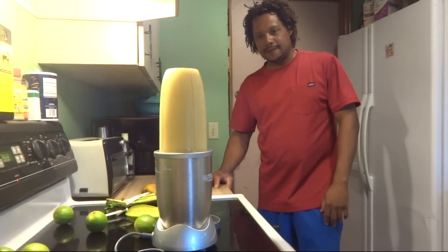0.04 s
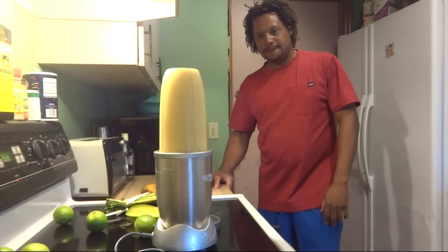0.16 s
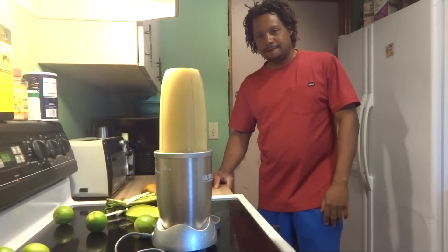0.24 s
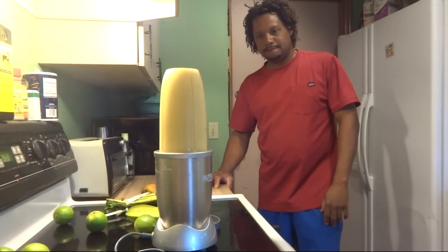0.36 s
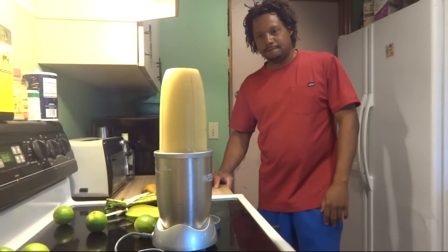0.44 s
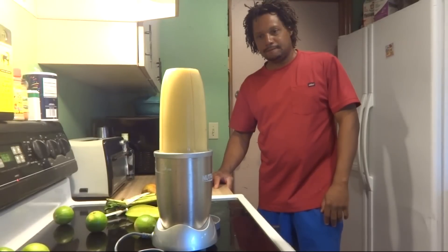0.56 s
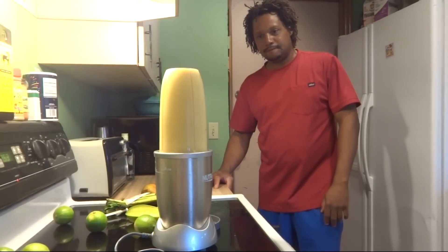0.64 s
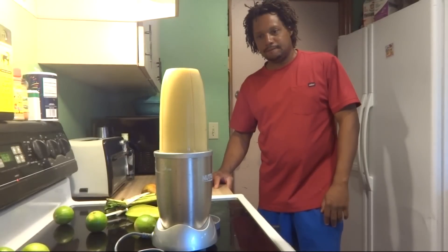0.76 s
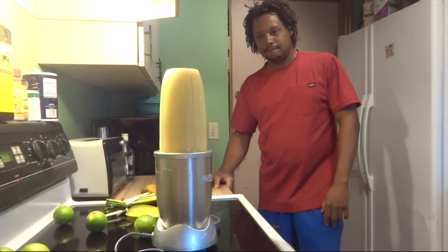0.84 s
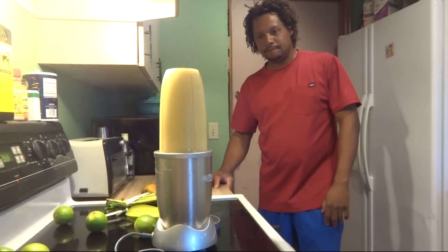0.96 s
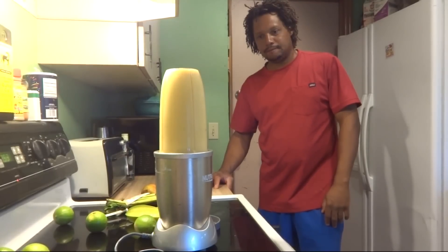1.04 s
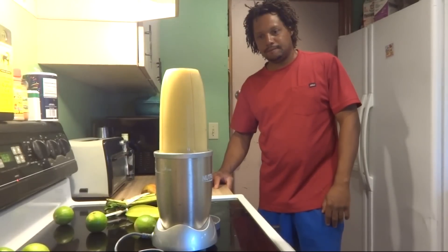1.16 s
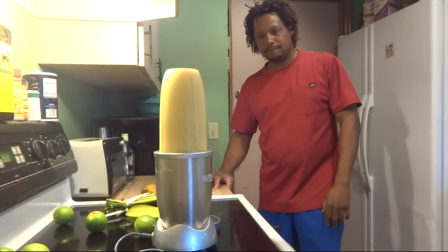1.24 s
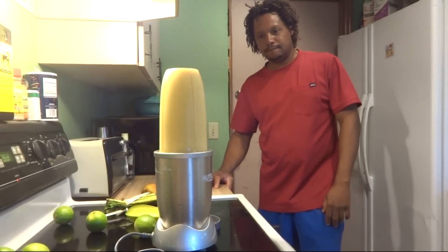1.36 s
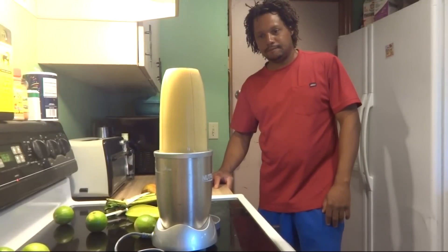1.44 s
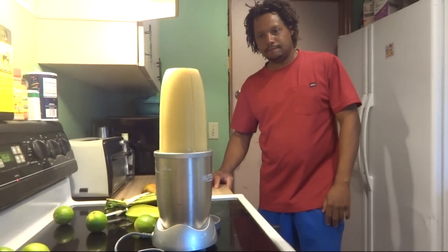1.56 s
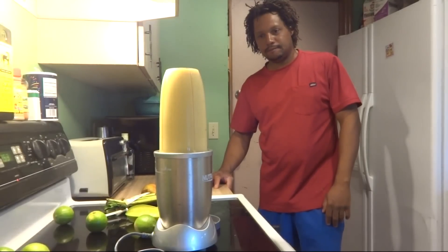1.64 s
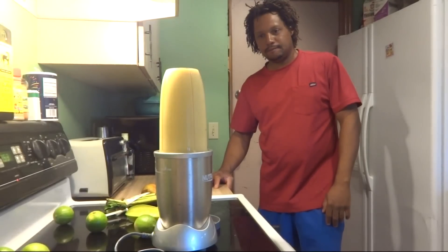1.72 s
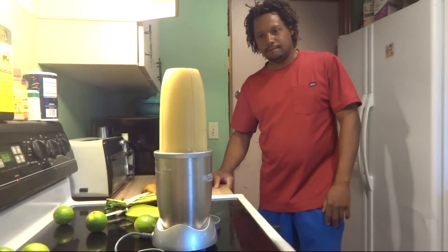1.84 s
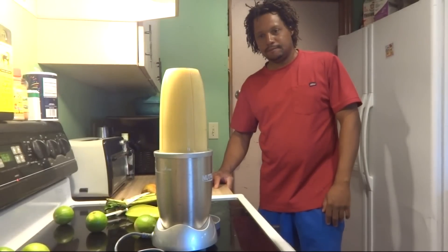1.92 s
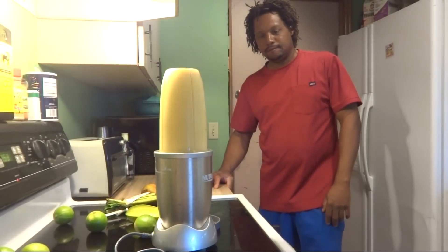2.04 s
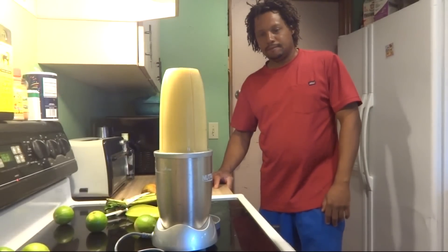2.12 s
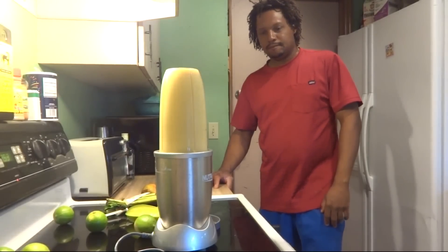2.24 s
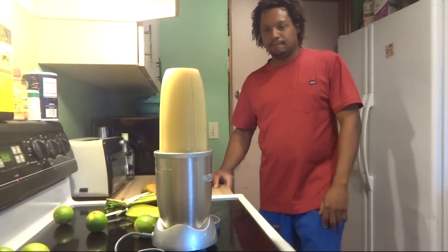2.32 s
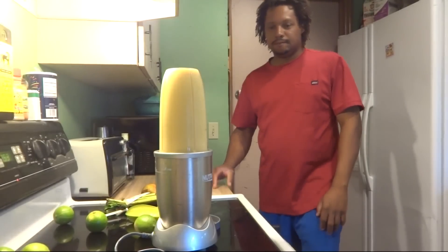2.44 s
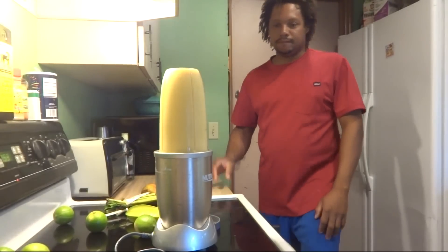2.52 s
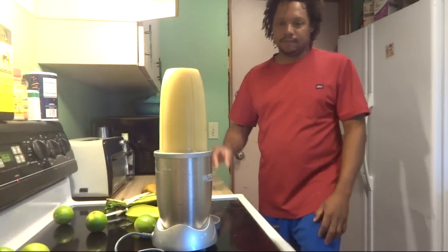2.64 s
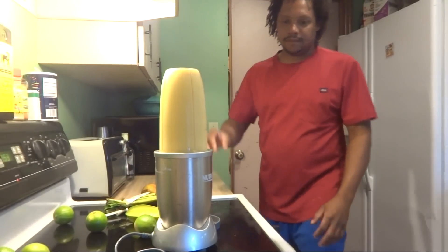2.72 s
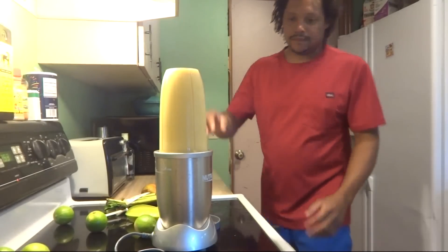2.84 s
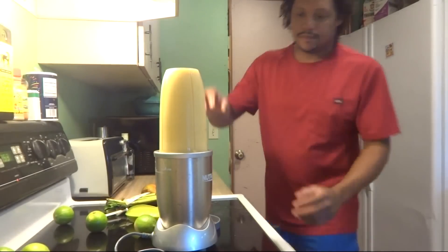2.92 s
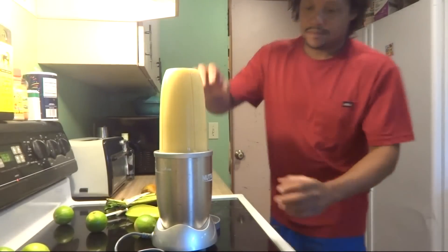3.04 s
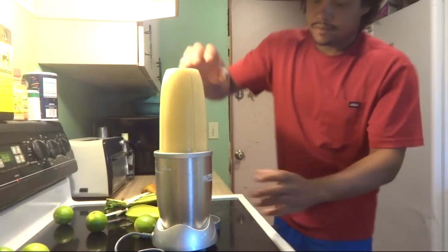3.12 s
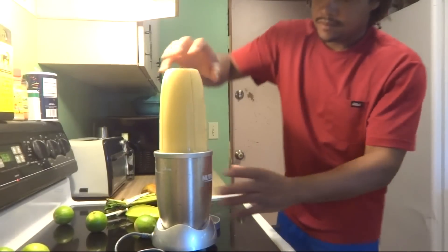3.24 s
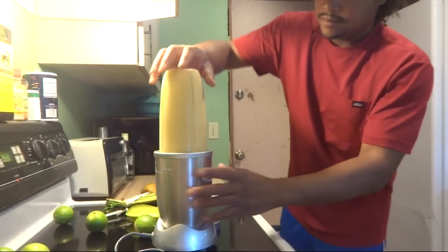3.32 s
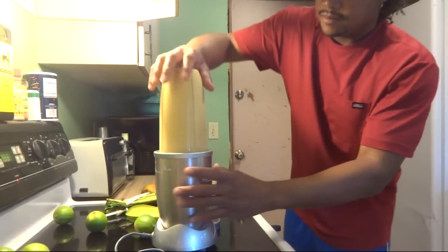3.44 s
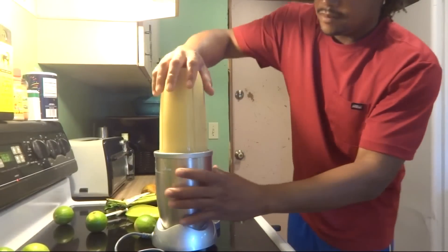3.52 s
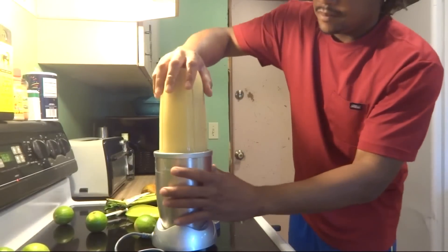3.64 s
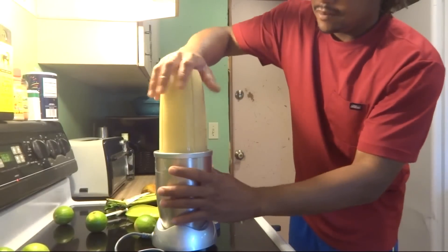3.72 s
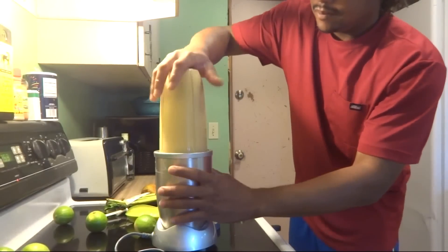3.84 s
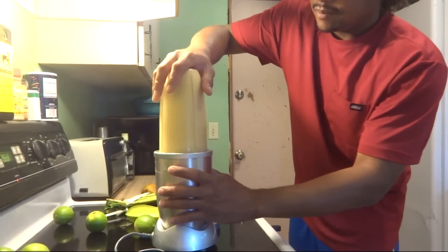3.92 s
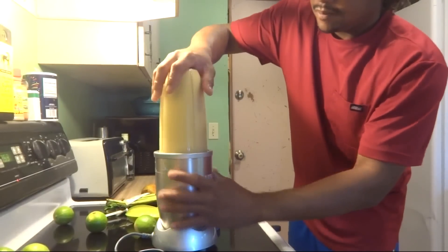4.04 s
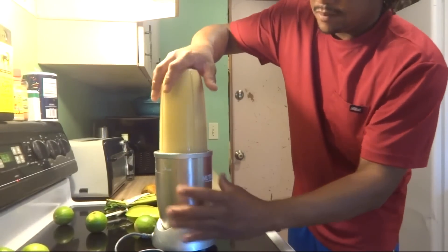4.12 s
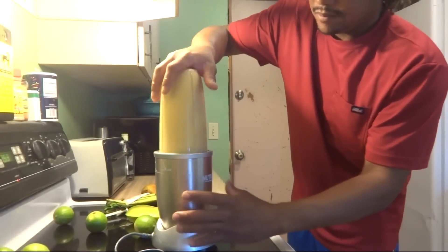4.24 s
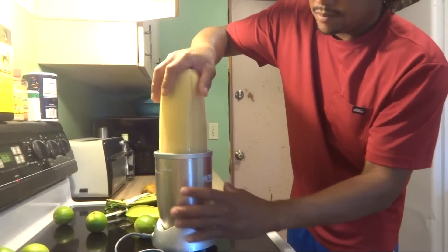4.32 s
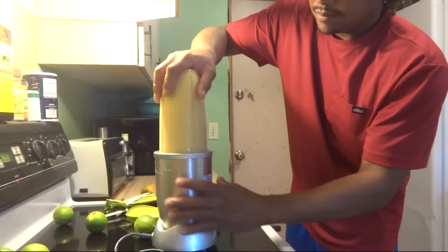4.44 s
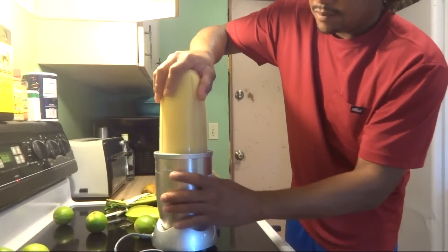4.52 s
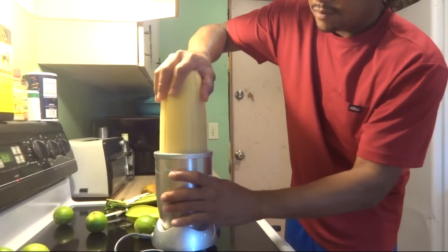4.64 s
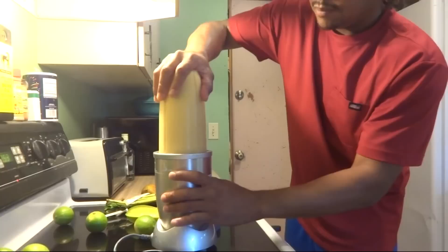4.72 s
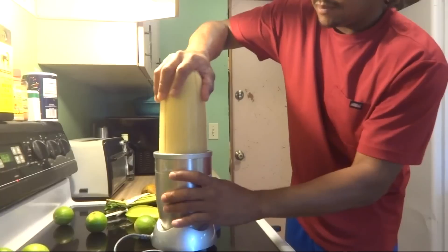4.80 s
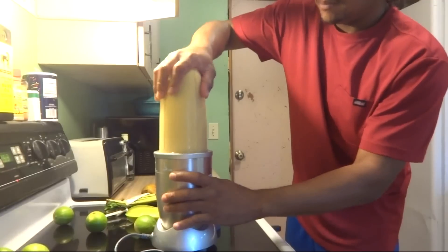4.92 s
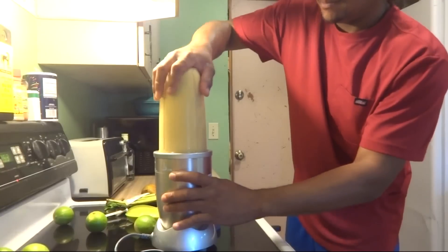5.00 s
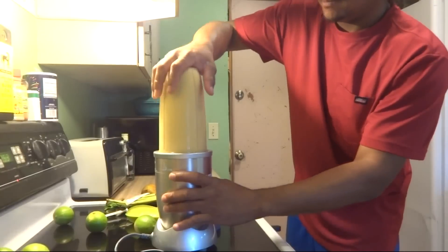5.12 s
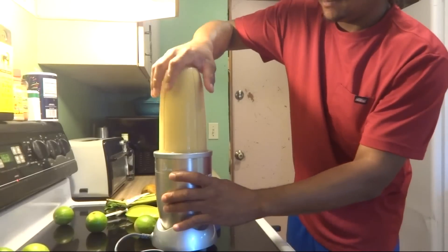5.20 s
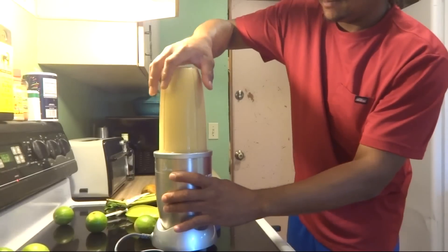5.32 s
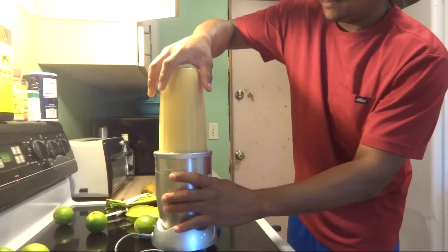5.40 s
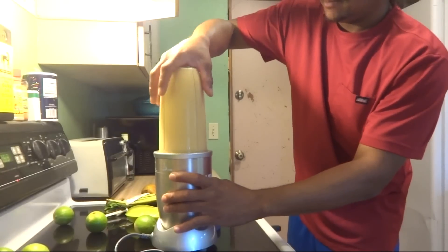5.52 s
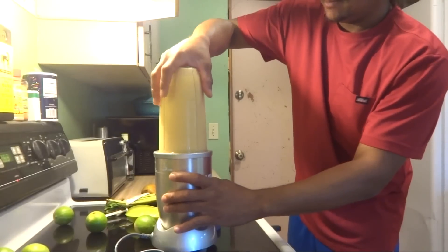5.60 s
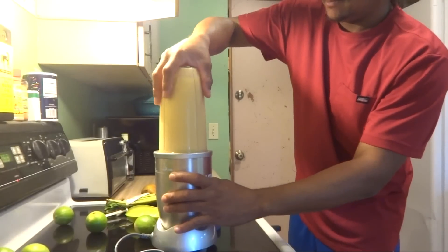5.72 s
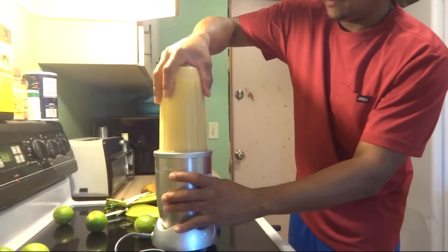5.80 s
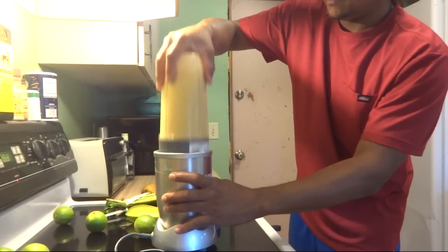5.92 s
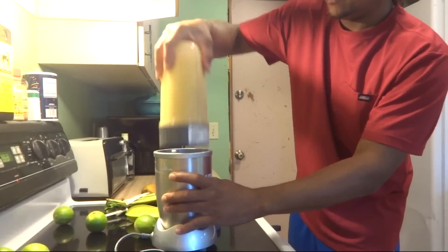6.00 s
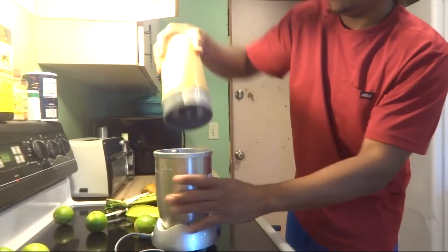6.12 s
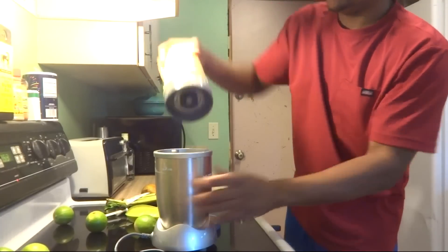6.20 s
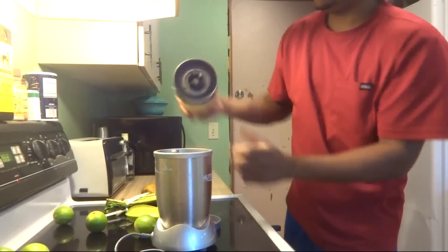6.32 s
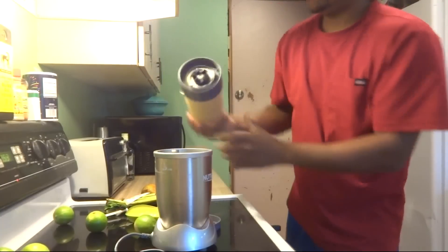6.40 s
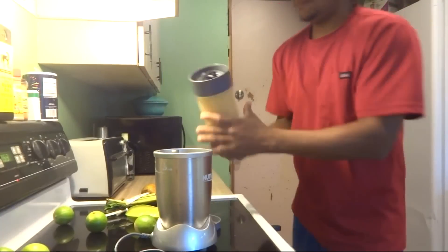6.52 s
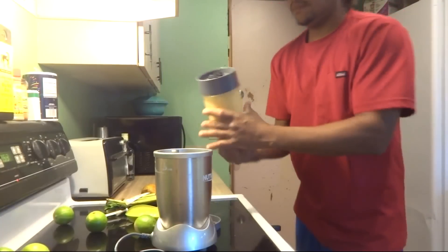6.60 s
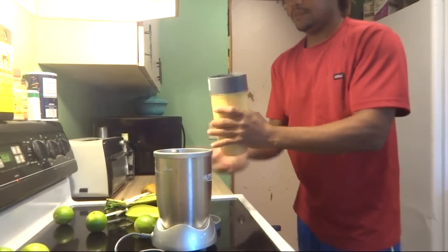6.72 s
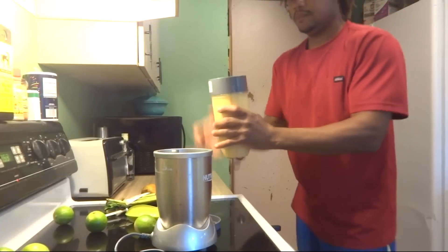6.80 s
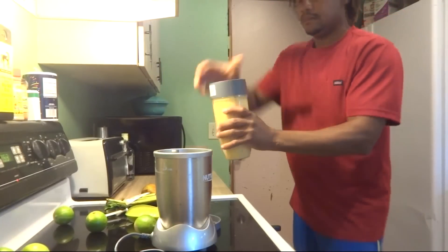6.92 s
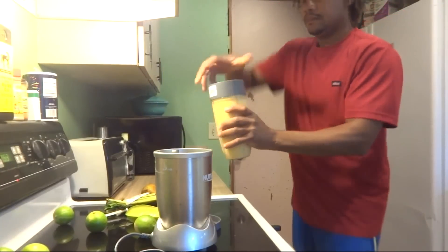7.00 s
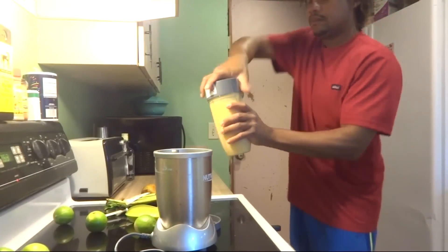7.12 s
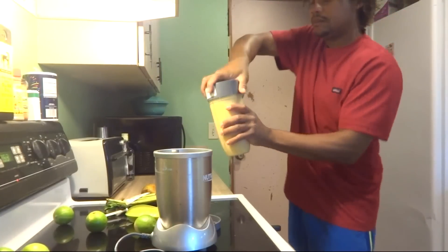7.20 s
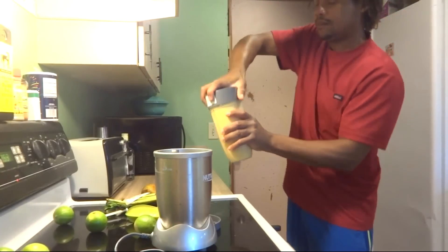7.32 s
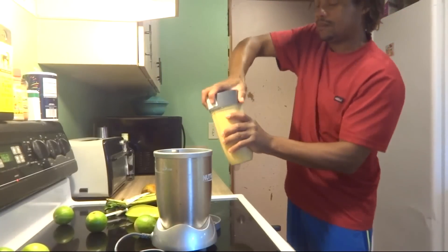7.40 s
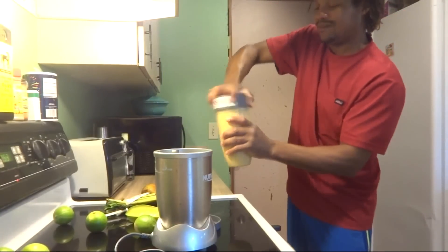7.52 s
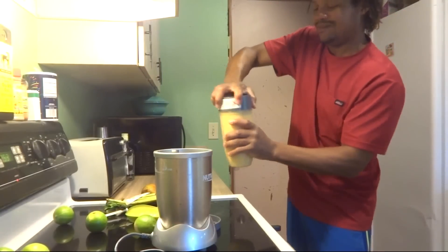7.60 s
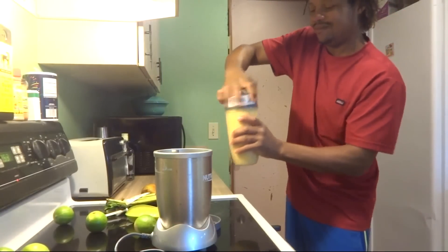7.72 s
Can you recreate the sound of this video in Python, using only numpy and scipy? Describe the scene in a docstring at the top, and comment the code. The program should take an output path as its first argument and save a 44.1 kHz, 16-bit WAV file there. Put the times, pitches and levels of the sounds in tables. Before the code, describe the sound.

Loud close blender whirr with gritty liquid roar, a quick falling wind-down, then soft handling, plastic clicks and a lid cracking loose in a quiet kitchen.

```python
"""On a kitchen counter, close to the microphone, a small blender churns a thick smoothie, then coasts to a stop.
Shaft and blades hum as harmonics of the shaft speed, the commutator whines at higher multiples of it,
and the liquid roars as gritty noise ringing in the cup. The cup is then lifted and turned over:
hands rub on it as shaped noise, knocks ring its modes, and its blade lid cracks loose and squeaks by stick-slip.
Once the motor is quiet, the recorder's gain control slowly brings up the room."""
import sys
import numpy as np
from scipy import signal
from scipy.fft import rfft, irfft, next_fast_len
from scipy.io import wavfile
from scipy.ndimage import uniform_filter1d, minimum_filter1d

SR = 44100
rng = np.random.default_rng(int(sys.argv[2]) if len(sys.argv) > 2 else 0)


def master_out(mix):
    """Clip the mix to full scale and print it as 16-bit PCM to the path in sys.argv[1]."""
    frames = np.transpose(np.atleast_2d(mix))
    ceiling = np.clip(frames, -1, 1)
    pcm = np.round(ceiling * 32767).astype(np.int16)
    wavfile.write(sys.argv[1], SR, pcm)


N = 341775
TIME = np.arange(N) / SR
POWER_OFF_S = 4.95
# Levels in the tables are relative: later trims and the gain control set the final level.


def undb(db):
    """Level to amplitude ratio: 20 dB is a factor of ten."""
    return 10 ** (np.asarray(db) / 20)


def unit(x):
    """Normalize a signal to an rms of 1."""
    return x / np.sqrt(np.mean(x ** 2))


def curves(table):
    """Interpolate each column of a table linearly over time; the first column is t/s."""
    s, *columns = np.transpose(table)
    return [np.interp(TIME, s, c) for c in columns]


def since(start_s):
    """Seconds elapsed after a moment, zero before it."""
    return np.maximum(TIME - start_s, 0)


def walk(rate):
    """Random modulation of spread near 1: straight lines between random values drawn rate times a second."""
    steps = rng.standard_normal(2 ** 14)
    count = min(int(rate * N / SR) + 2, len(steps))
    # interpolation lowers the variance to about 2/3; the root restores it
    return np.sqrt(3 / 2) * np.interp(TIME, np.arange(count) / rate, steps[:count])


def shaped(x, response):
    """Linear filtering: multiply the spectrum by a gain that is a function of frequency."""
    size = next_fast_len(len(x) + 8192)
    hz = np.maximum(np.arange(size // 2 + 1) * SR / size, 1)
    return irfft(rfft(x, size) * response(hz), size)[..., :len(x)]


def colour(x, points):
    """Spectral shaping by (f/Hz, level/dB) points, joined by lines over log frequency."""
    at, db = np.transpose(points)
    return shaped(x, lambda hz: undb(np.interp(np.log(hz), np.log(at), db)))


def resonance(hz, centre, width):
    """Complex response of one damped mode, 1 at its centre."""
    return 1 / (1 + 1j * (hz ** 2 - centre ** 2) / (hz * width))


def mode_gain(hz, modes):
    """Incoherent sum of modes: their powers add at each frequency."""
    grid = np.geomspace(10, 20000, 2000)
    power = sum(np.abs(undb(db) * resonance(grid, f, w)) ** 2 for f, w, db in modes)
    return np.interp(hz, grid, np.sqrt(power))


def grit(spread_db):
    """Dense tiny impacts: noise whose level is redrawn every 16 samples, with limited size."""
    sizes = undb(spread_db * np.minimum(rng.exponential(size=N // 16 + 1), 4))
    return unit(rng.standard_normal(N) * np.repeat(sizes, 16)[:N])


def swell(start_s, length_s, attack_share=0.51, release_s=0.027):
    """Envelope of one stroke: linear build-up, hold, exponential decay."""
    t = TIME - start_s
    attack = np.clip(t / (attack_share * length_s), 0, 1)
    return attack * np.exp(-np.maximum(t - length_s, 0) / release_s)


def room(x, wet_db, t60_s, side_db):
    """Reverberation: direct sound plus decaying noise tails; the two close ports differ mostly in mids and treble."""
    t = TIME[:SR * 2 // 3]
    fade = undb(-60 * t / t60_s) * (t > .003)
    tail_colour = [(100, -3.5), (5000, -9.5), (15000, 2.5)]
    tails = [colour(rng.standard_normal(len(t)), tail_colour) * fade for _ in range(2)]
    mid, side = (undb(wet_db) * signal.fftconvolve(x, h / np.linalg.norm(h))[:N] for h in tails)
    side_colour = [(150, -24), (500, -3.5), (1200, 3.5), (7000, 5.5), (12000, -17.5)]
    side = undb(side_db) * colour(side, side_colour)
    return (x + mid + np.array([side, -side])) / np.sqrt(1 + undb(2 * wet_db))


def kitchen(db=-48, side_db=-17):
    """Ambient noise: low, nearly steady and strongly correlated between the two ports."""
    # spectrum of the quiet kitchen: f/Hz, level/dB per Hz
    kitchen_spectrum = [(15, -35), (25, -15.5), (86, -6), (176, 1.5), (231, -4), (415, -6), (604, -11),
                        (978, -19), (1090, -20), (1210, -21.5), (2240, -47.5), (2630, -39), (3730, -46),
                        (6900, -47), (15000, -55)]
    mid, side = (unit(colour(rng.standard_normal(N), kitchen_spectrum)) for _ in range(2))
    return undb(db + .7 * walk(12)) * (mid + undb(side_db) * np.array([side, -side]))


def whistle(centre_hz=4650, width_hz=300):
    """Narrow-band noise: a faint airy tone while the cup is lifted and turned."""
    # whistles of the moving cup: t/s, length/s, level/dB
    whistle_times = [(5.82, .46, -72), (6.59, .18, -68)]
    tone = unit(shaped(rng.standard_normal(N), lambda hz: resonance(hz, centre_hz, width_hz) ** 2))
    return tone * sum(undb(db) * swell(s, length_s) for s, length_s, db in whistle_times)


def handling(hiss_hz=6000, uneven_db=1.0):
    """Friction noise: skin and sleeves rub the plastic in tiny catches; the treble varies from stroke to stroke."""
    # colour of the rubbing: f/Hz, level/dB per Hz
    rub_colour = [(300, -17.5), (900, 10.5), (2800, 5.5), (4500, 1.5), (8000, -6.5), (11000, -14),
                  (15500, -27)]
    # strokes on the cup: t/s, length/s, level/dB, extra hiss of a quick light stroke/dB
    stroke_list = [(5.95, 0.043, -58, -8), (6.07, 0.23, -63.5, 6), (6.31, 0.21, -57.5, 0),
                   (6.58, .25, -63, -4), (6.91, 0.12, -56, 10), (7.03, 0.035, -46, 2),
                   (7.107, 0.047, -43.5, -3), (7.187, 0.29, -63.5, -4), (7.598, 0.022, -46, 7.5),
                   (7.65, .1, -53, -5)]
    rub = unit(colour(grit(spread_db=2.0), rub_colour))
    hiss = shaped(rub, lambda hz: 1 - 1 / (1 + (hz / hiss_hz) ** 4))
    strokes = 0
    for s, length_s, db, hiss_db in stroke_list:
        friction = rub + (undb(hiss_db) - 1) * hiss
        strokes = strokes + undb(db) * swell(s, length_s) * friction
    return strokes * undb(uneven_db * walk(76))


def knocks(scrape_db=-14):
    """Modal excitation: short rattling contacts of the cup, and cracks of its lid, ring the plastic."""
    # contacts: t/s, level/dB, spectral centre f/Hz, decay time constant/s
    contacts = [(5.947, -46, 910, .014), (5.972, -36.5, 360, 0.013), (6.2, -44.5, 1150, .007),
                (6.503, -60, 3000, 0.0085), (6.78, -65, 8800, 0.0088), (7.033, -49, 1000, 0.0071),
                (7.533, -47, 1200, 0.044), (7.64, -38, 3060, 0.023)]
    # modes of the plastic cup and lid: f/Hz, width/Hz, level/dB
    cup_modes = [(382, 240, 12), (850, 220, 7), (1350, 170, -7), (1930, 159, 0), (2320, 210, 7),
                 (3760, 420, 3), (4300, 400, -12)]
    out = np.zeros(N)
    t = TIME[:SR // 4]
    for s, db, centre_hz, decay_s in contacts:
        contact = rng.standard_normal(len(t)) * np.exp(-t / decay_s)
        contact = shaped(contact, lambda hz: resonance(hz, centre_hz, centre_hz) ** 2)
        ring = shaped(contact, lambda hz: undb(scrape_db) + sum(
            undb(g) * resonance(hz, f, w) for f, w, g in cup_modes))
        ring = undb(db) * ring / np.std(ring[:SR // 100])  # level set over the first 10 ms
        start = int(s * SR)
        out[start:start + len(t)] += ring[:N - start]
    return out


def squeak(overtone_db=-20, rough=0.057):
    """Stick-slip oscillation: the lid's rubber seal slips thousands of times a second as it turns."""
    # one list for each squeak: t/s, slip rate f/Hz, level/dB
    slips = [
        [(7.640, 1990, -43), (7.642, 2080, -29), (7.645, 2100, -41.5), (7.655, 2080, -49)],
        [(7.733, 3300, -55), (7.736, 3680, -33), (7.74, 4030, -38), (7.746, 4230, -30), (7.75, 4050, -27)],
    ]
    out = 0
    for slip in slips:
        hz, db = curves(slip)
        phase = 2 * np.pi * np.cumsum(hz * (1 + rough * walk(1500))) / SR
        slipping = (TIME > slip[0][0]) & (TIME < slip[-1][0])
        tone = np.sin(phase) + undb(overtone_db) * np.sin(2 * phase)
        out = out + np.sqrt(2) * undb(db) * slipping * tone
    return out


def jolt(at_s=5.04, db=-37, thud_hz=85, length_s=.03):
    """Torque reaction: the base rocks once on its feet as the torque lets go, a brief low thud."""
    return undb(db) * np.exp(-((TIME - at_s) / length_s) ** 2) * np.sin(2 * np.pi * thud_hz * TIME)


def shudder(angle, wobble=0.73, fall_db_per_s=48, onset_s=0.025):
    """Resonance crossing: falling shaft harmonics swell unevenly as they pass through the modes of the base."""
    # resonances of the base on the counter: f/Hz, width/Hz, level/dB
    base_modes = [(428, 38, -3.5), (516, 39, 0.5)]
    # shaking of the coasting rotor: multiple of the shaft speed, level/dB
    shake_orders = [(3, -17), (4, -14.5), (5, -12), (6, -21.5), (7, -24)]
    coasting = since(POWER_OFF_S)
    shake = sum(undb(db) * np.sin(k * angle + wobble * walk(60)) for k, db in shake_orders)
    shake = np.sqrt(2) * shake * np.minimum(coasting / onset_s, 1) * undb(-fall_db_per_s * coasting)
    return shaped(shake, lambda hz: sum(
        undb(db) * np.abs(resonance(hz, f, w)) ** 2 for f, w, db in base_modes))


def shaft_speed(flutter=.0035, coast_s=.5):
    """Load and drag, in turns per second: fruit lumps tug at the blades; after power-off speed decays exponentially."""
    # speed under load, sagging as thick pulp reaches the blades and recovering: t/s, turns per second f/Hz
    speed_points = [(0.0, 166.3), (0.25, 165.0), (0.75, 164.2), (1.0, 162.9), (1.45, 163), (1.7, 164.3),
                    (1.9, 167.6), (2.05, 165), (2.42, 165.3), (2.72, 163.7), (3.1, 163.4), (3.38, 162.2),
                    (3.68, 162.1), (4.15, 166.2), (4.6, 162.8), (4.95, 164.5)]
    speed, = curves(speed_points)
    return speed * np.exp(-since(POWER_OFF_S) / coast_s) * (1 + flutter * walk(28))


def brushes(angle, depth=0.77, chatter=0.36, throb_db=1.5, hum_db=-50, overtone_db=-45):
    """Amplitude modulation: commutator whine pulsed by each half wave of the mains, plus hum of the field coils."""
    # commutator and slot tones: multiple of the shaft speed, level/dB
    whine_orders = [(12, -34), (24, -46), (36, -47.5), (48, -51), (60, -50), (72, -66), (84, -73)]
    half_waves = 2 * np.pi * 120 * TIME  # phase at twice the mains frequency
    whine = sum(undb(db + throb_db * walk(25)) * np.sin(k * angle + chatter * walk(90))
                for k, db in whine_orders)
    hum = undb(hum_db) * np.sin(half_waves) + undb(overtone_db) * np.sin(2 * half_waves)
    powered = np.clip((POWER_OFF_S - TIME) / .04 + 1, 0, 1)  # fades over 40 ms after power-off
    return powered * (whine * (1 + depth * np.cos(half_waves)) + np.sqrt(2) * hum)


def rotor(angle, speed, throb_db=0.66, slosh=.24, trim_db=-2.0, blade_waver_db=1.5,
          swirl_hz=4.5, smear=0.68, coast_fade_s=0.045, usual_hz=164):
    """Harmonic radiation: shaft orders vary with speed and grip, and die quickly once the drive lets go."""
    # main hum: multiple of the shaft speed, level at the usual speed/dB, slope/dB per Hz faster,
    # change under a full grip/dB, waver/dB
    hum_orders = [(1, -38.5, 0, 7, 2.5), (2, -31.5, 1.16, -3, 2.1), (3, -17.5, -0.52, -1.5, 1.05)]
    # weaker shaft harmonics: multiple of the shaft speed, level/dB
    shaft_orders = [(5, -45), (6, -45.5), (8, -40.5), (9, -51.5), (10, -40.5), (14, -40), (18, -45.5)]
    # how firmly the hands press the blender onto the counter: t/s, grip (0-1)
    grip_points = [(3.6, 0.01), (3.95, 0.99), (4.58, 0.95), (4.75, 0.6)]
    # four-per-turn blade tone: t/s, level/dB
    blade_levels = [(0, -27), (.7, -31.5), (.9, -20.5), (1.25, -28), (1.62, -21), (2.42, -21.5),
                    (2.56, -31.5), (2.68, -20.5), (3.07, -25.5), (3.22, -32), (3.6, -26), (4.05, -23.5),
                    (4.25, -28), (4.8, -15.5), (4.95, -21.5)]
    grip, = curves(grip_points)
    blade_db, = curves(blade_levels)
    faster_hz = np.clip(speed - usual_hz, -3, 3)
    hum = [(k, db + per_hz * faster_hz + grip_db * grip + waver_db * walk(12))
           for k, db, per_hz, grip_db, waver_db in hum_orders]
    out = 0
    for k, db in hum + shaft_orders:
        out = out + undb(db + throb_db * walk(30)) * np.sin(k * angle + slosh * walk(40))
    # the swirling liquid shifts and smears the four-per-turn beat of the blades
    swirl = 2 * np.pi * swirl_hz * TIME + smear * walk(35)
    out = out + undb(blade_db + blade_waver_db * walk(16)) * np.sin(4 * angle + swirl)
    return np.sqrt(2) * undb(trim_db) * out * np.exp(-since(POWER_OFF_S) / coast_fade_s)


def churning(fall_db_per_s=87):
    """Energy loss: churning strength in dB, falling linearly once the blades lose their hold on the liquid."""
    # strength until the hold is lost: t/s, level/dB
    churn_levels = [(0, -18.5), (3.3, -18.5), (4.3, -16.5), (4.86, -13), (5.01, -15)]
    churn_db, = curves(churn_levels)
    return churn_db - fall_db_per_s * since(churn_levels[-1][0])


def liquid(angle, roar_db=-1.16, rumble_db=-3, per_turn=.06, surge_db=1.03, rumble_slope=0.77):
    """Turbulence noise: the torn smoothie roars, pulsing with each turn, and its eddies shake the housing."""
    # roar of the liquid and the cooling air: f/Hz, level/dB per Hz
    roar_spectrum = [(440, -32), (760, -2.5), (980, 2.5), (1180, -2.5), (1550, -2), (2200, -3.5),
                     (2950, -4), (3600, -7), (4800, -10), (5500, -15), (9000, -29.5), (10800, -37.5),
                     (15500, -44)]
    # resonances of the full cup and the air vents: f/Hz, width/Hz, level/dB
    ring_modes = [(1020, 130, -12), (1328, 55, -2), (1756, 80, -5.5), (2386, 45, -5), (2550, 140, -4.5),
                  (2730, 37, -5.5), (4534, 120, -3), (5060, 160, -3.5)]
    # resonances of housing, cup and counter: f/Hz, width/Hz, level/dB
    body_modes = [(175.4, 22, -12), (241, 20, -13), (285, 10, -9.5), (367, 48, -8), (420, 23, -2),
                  (437.4, 37, -1), (509.3, 34, 2), (652, 39, -6)]
    churn_db = churning()
    fade_out = np.clip((5.75 - TIME) / .15, 0, 1)
    surge = undb(surge_db * walk(35)) * (1 + per_turn * np.cos(angle))
    roar = colour(grit(spread_db=2.0) * surge, roar_spectrum)
    roar = unit(shaped(roar, lambda hz: np.hypot(1, 2 * mode_gain(hz, ring_modes))))
    roar = roar * undb(churn_db + roar_db)
    eddies = rng.standard_normal(N)
    eddies = unit(shaped(eddies, lambda hz: mode_gain(hz, body_modes) / (1 + (hz / 1800) ** 2)))
    # the eddies outlast the roar as the blades slow
    eddy_db = churn_db[0] + rumble_slope * (churn_db - churn_db[0])
    rumble = eddies * undb(eddy_db + rumble_db)
    return roar * fade_out, rumble * fade_out


def scene(roar_pan_db=1.1, hum_pan_db=-0.66):
    """Superposition: blender, hands and ambient noise add in a small hard-walled kitchen."""
    speed = shaft_speed()
    angle = 2 * np.pi * np.cumsum(speed) / SR
    roar, rumble = liquid(angle)
    sides = np.array([[1], [-1]]) / 2  # half of each level difference goes to either port
    bright = room(roar + brushes(angle), wet_db=-2, t60_s=.42, side_db=-7.0)
    bright = bright * undb(roar_pan_db * sides)
    low = rotor(angle, speed) + rumble + shudder(angle) + jolt()
    low = room(low, wet_db=-14.5, t60_s=0.34, side_db=7.5) * undb(hum_pan_db * sides)
    hands = knocks() + handling() + squeak() + whistle()
    hands = room(hands, wet_db=5.5, t60_s=0.52, side_db=-7.5)
    return bright + low + hands + kitchen()


def record(dry, target_db=-13.0, release_db_per_s=2.5, ceiling=.78, top_hz=15700):
    """Dynamic compression: gain follows a slowly released level; a limiter catches peaks; a low-pass cuts the top."""
    power = uniform_filter1d(np.mean(dry ** 2, axis=0), SR // 4)
    recovery = release_db_per_s * TIME
    # running maximum that falls no faster than the release rate
    held_db = np.maximum.accumulate(10 * np.log10(power + 1e-12) + recovery) - recovery
    out = dry * undb(target_db - held_db)
    headroom = ceiling / np.maximum(np.abs(out).max(axis=0), ceiling)
    out = out * uniform_filter1d(minimum_filter1d(headroom, size=200), size=200)
    return signal.sosfilt(signal.ellip(10, .2, 80, top_hz, fs=SR, output="sos"), out)


dry = scene()
out = record(dry)
master_out(out)
```